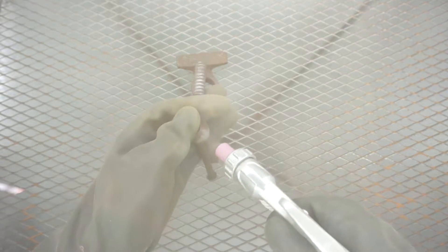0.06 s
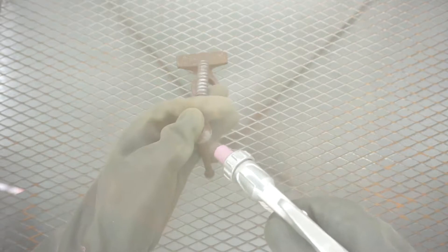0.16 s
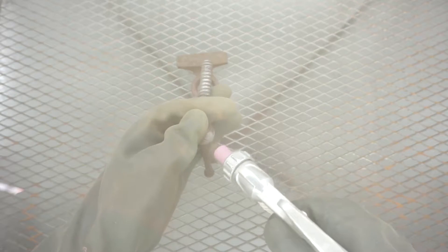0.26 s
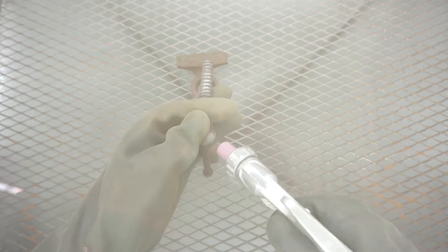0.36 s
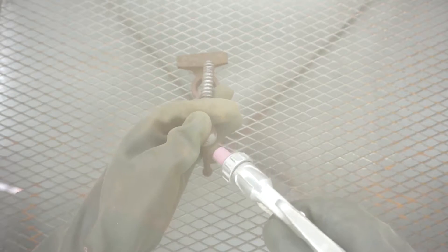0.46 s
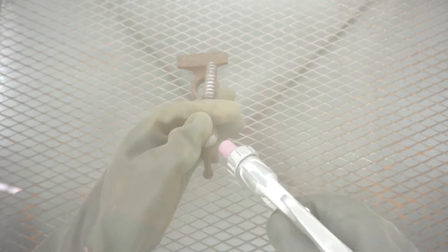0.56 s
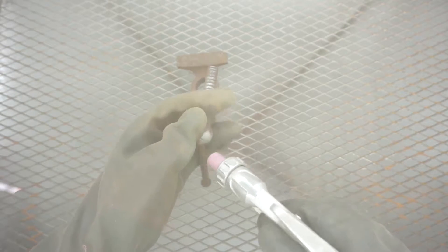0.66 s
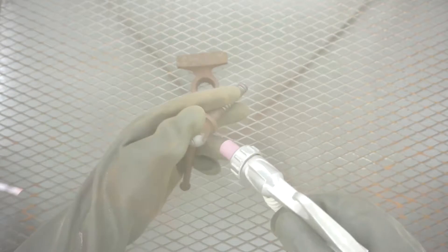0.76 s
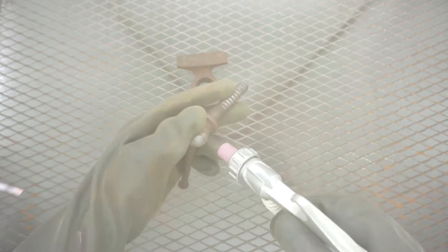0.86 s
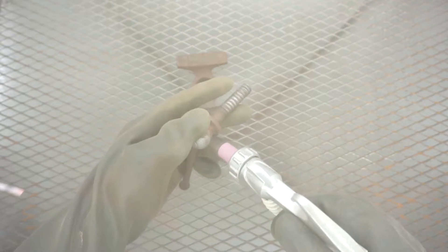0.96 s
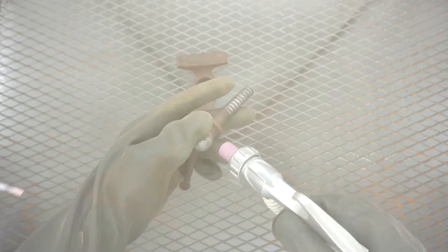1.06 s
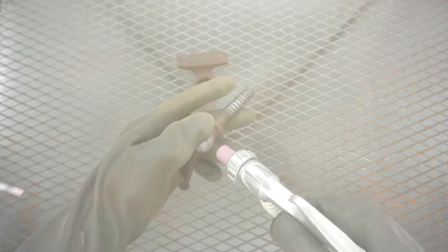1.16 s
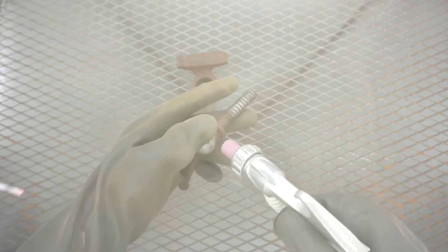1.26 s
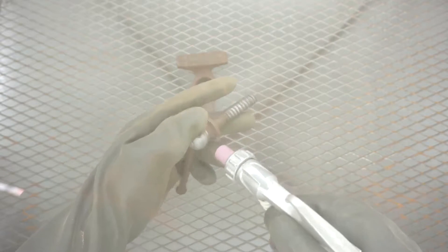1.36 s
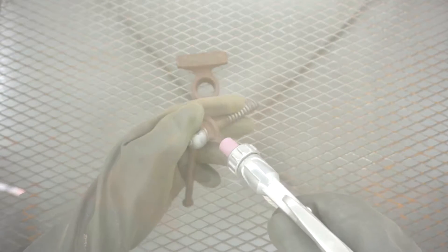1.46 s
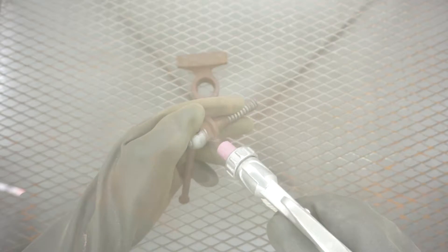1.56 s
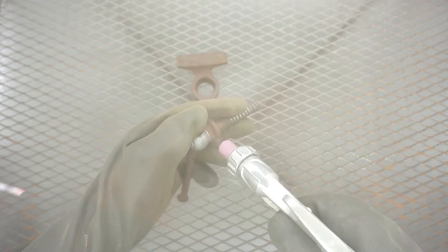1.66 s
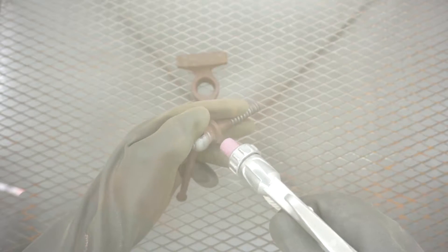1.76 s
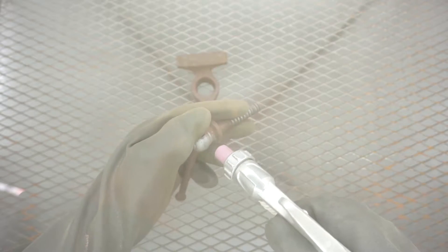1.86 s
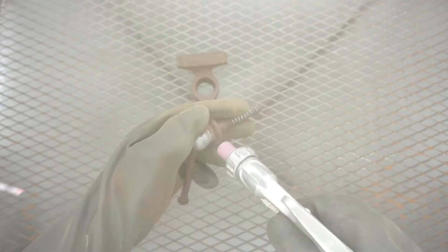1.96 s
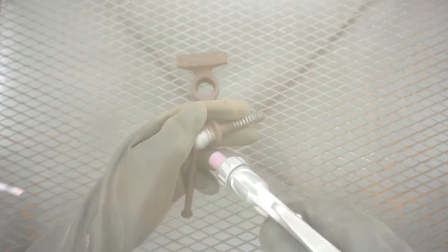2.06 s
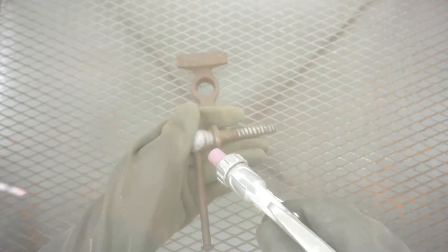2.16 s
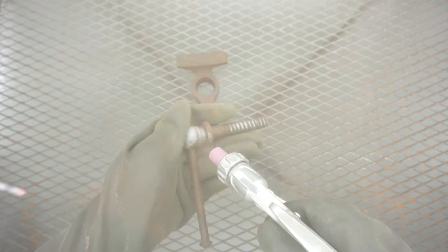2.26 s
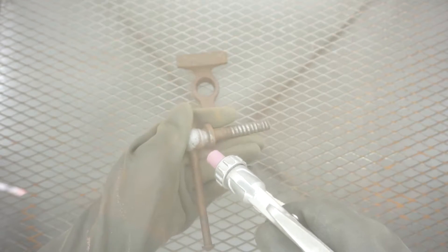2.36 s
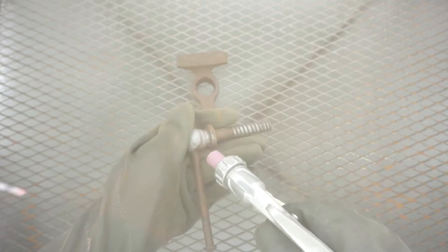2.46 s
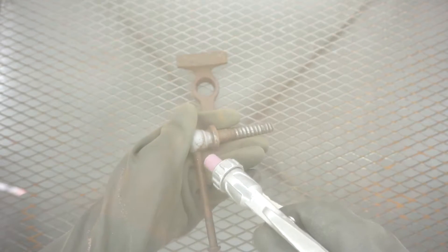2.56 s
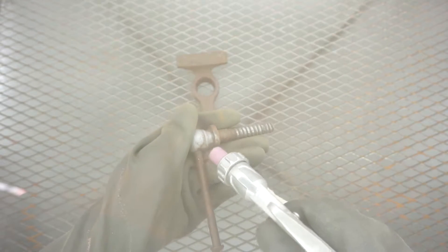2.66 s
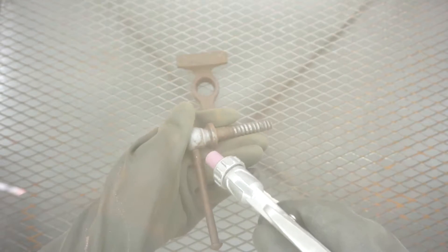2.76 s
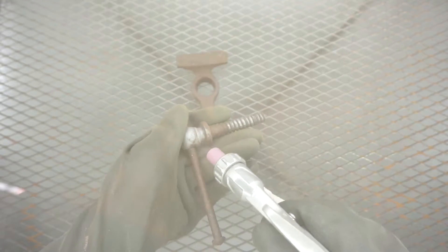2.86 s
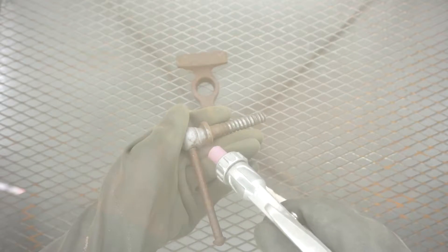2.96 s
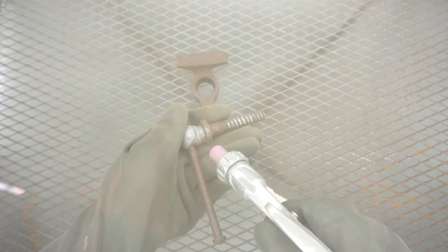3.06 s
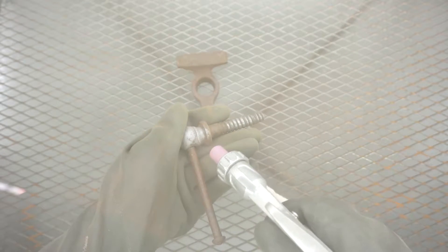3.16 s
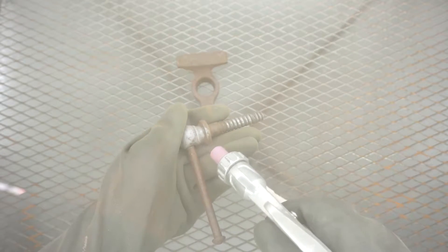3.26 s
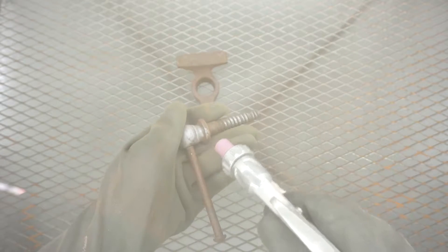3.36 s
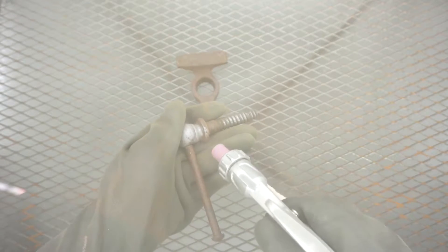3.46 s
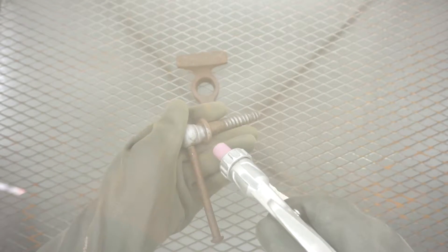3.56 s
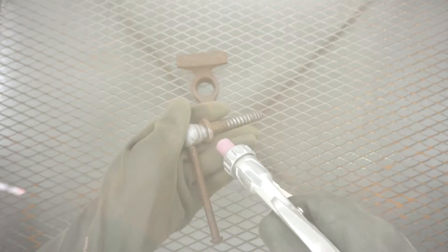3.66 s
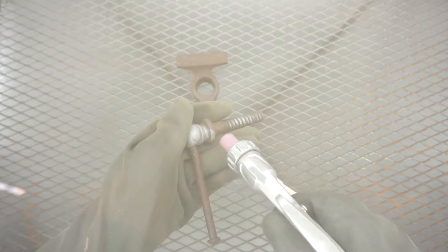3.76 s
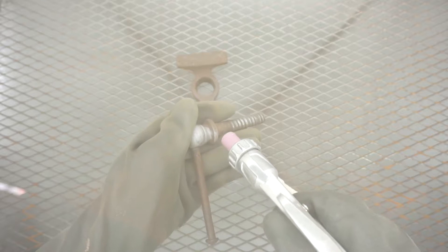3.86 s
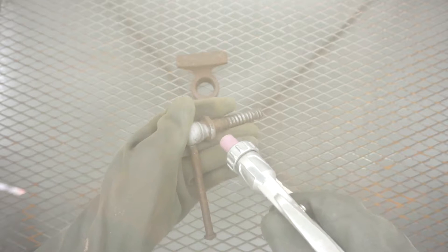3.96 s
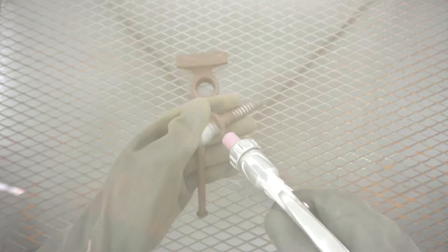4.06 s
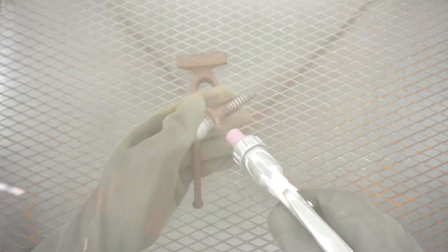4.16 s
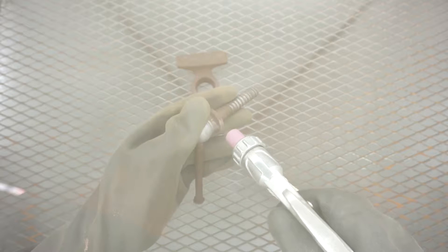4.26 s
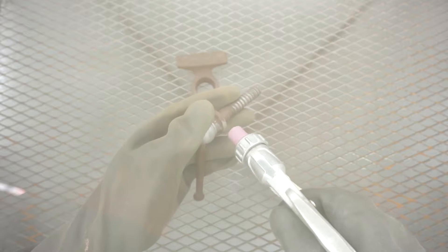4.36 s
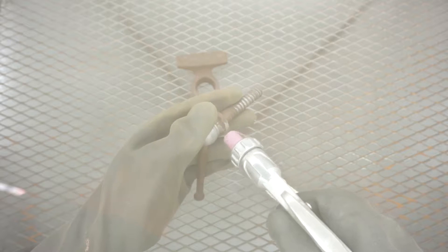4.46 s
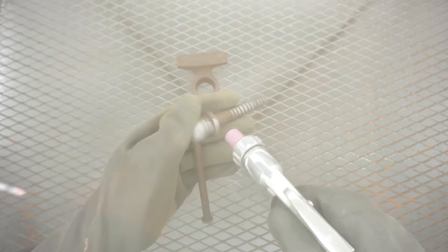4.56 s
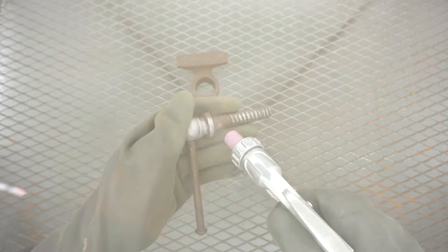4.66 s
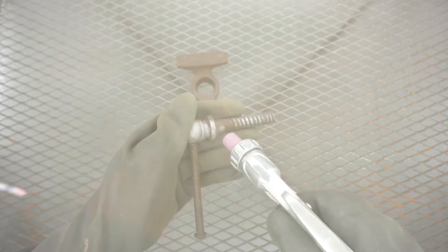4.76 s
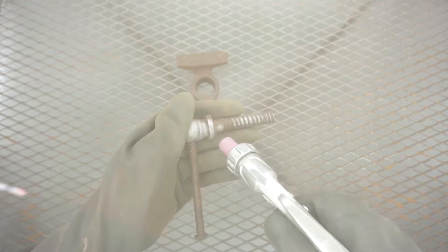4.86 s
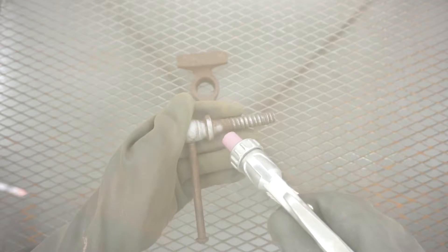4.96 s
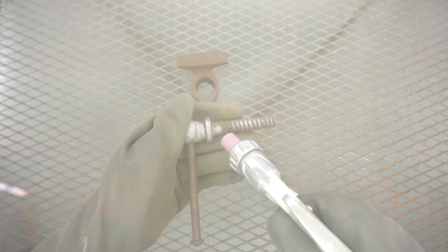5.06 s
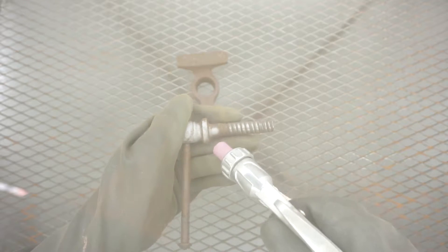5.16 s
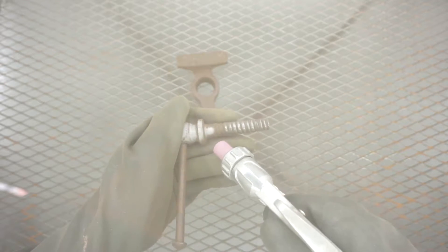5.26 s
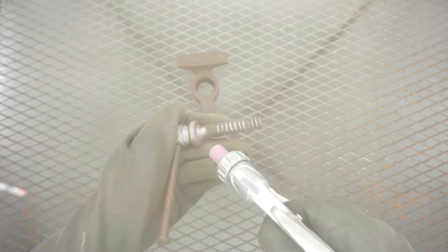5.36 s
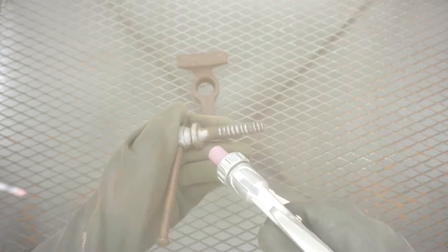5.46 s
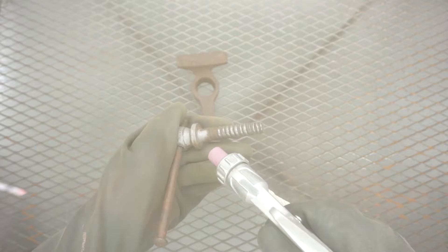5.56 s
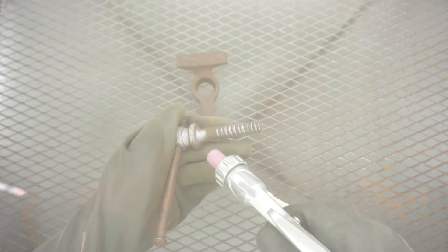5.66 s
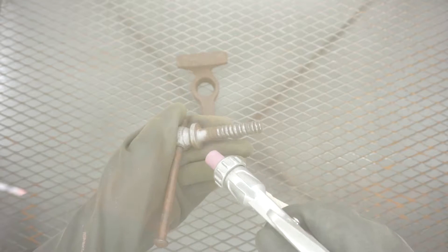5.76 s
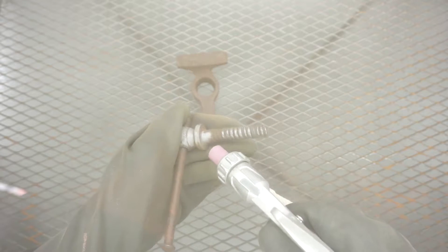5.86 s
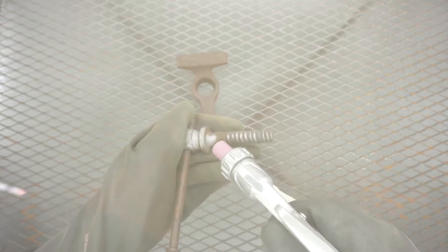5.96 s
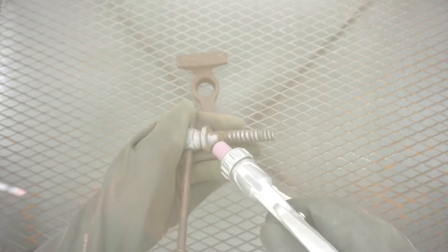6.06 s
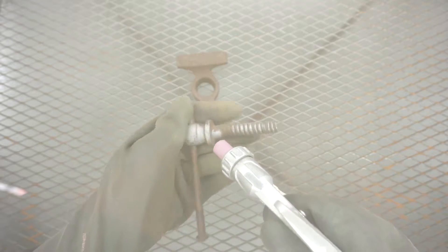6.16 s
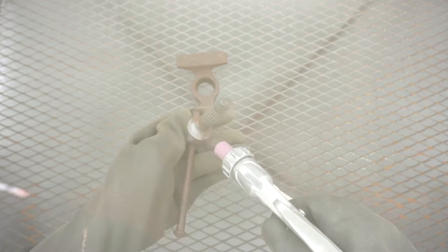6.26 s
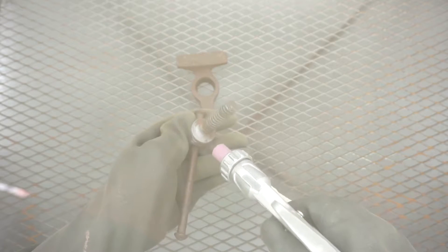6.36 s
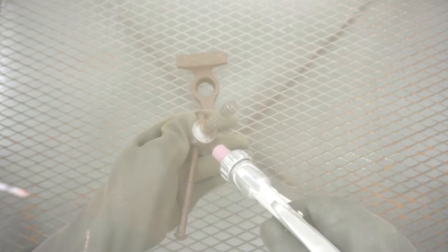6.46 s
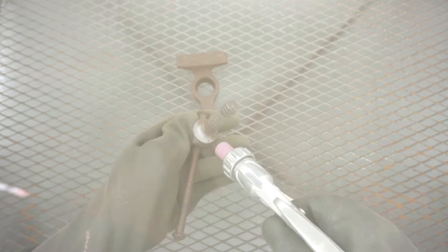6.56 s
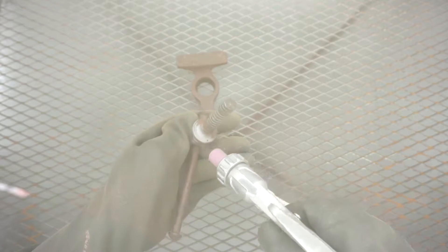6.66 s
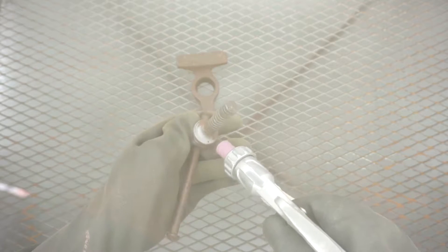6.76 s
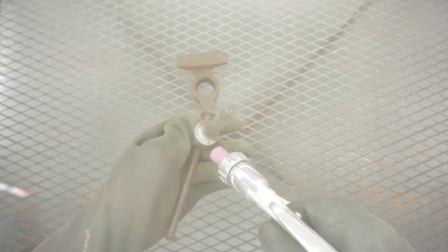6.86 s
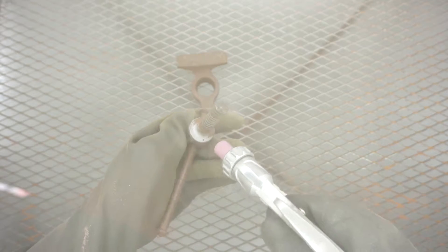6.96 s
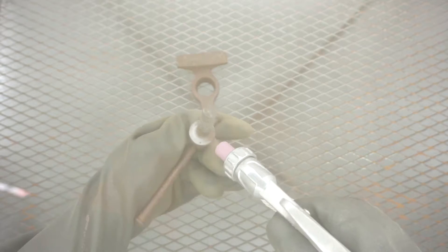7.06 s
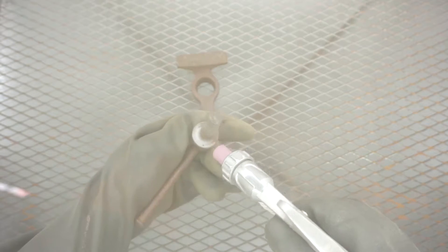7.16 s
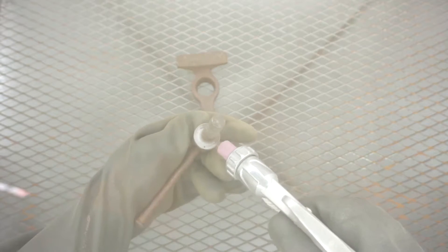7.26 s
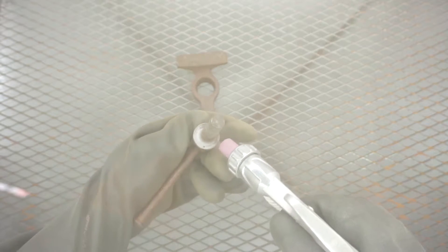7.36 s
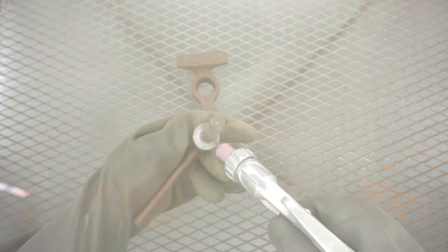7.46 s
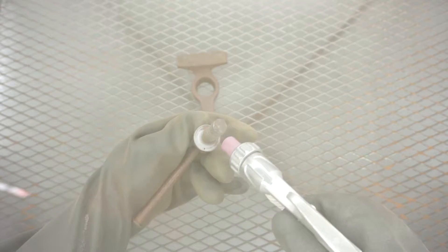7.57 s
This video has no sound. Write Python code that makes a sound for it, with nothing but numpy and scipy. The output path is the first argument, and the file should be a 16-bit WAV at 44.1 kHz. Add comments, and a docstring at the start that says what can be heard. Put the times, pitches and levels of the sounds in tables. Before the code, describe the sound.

Close inside a blast cabinet, pressurised air and abrasive make a sharp, dense hiss with a fluttering, sandy texture. The metal box roars quietly beneath, swelling and thinning as the steel part swings through the jet. Very brief dips punctuate the noise, some with soft dull thuds. Faint airy hoots and low booms come and go above a weak extractor drone, heard in wide stereo.

```python
"""Sandblasting in a steel cabinet

Inside a sheet-metal blast cabinet a gun strips rust from a steel clamp screw, heard at two microphone ports.
Up front the nozzle hisses (shaped noise), grit sprays off the part (tiny impacts) and the cabinet roars
(resonant noise). The jet sizzles and faintly whistles on the steel; now and then the level dips briefly.
Behind it a motor hums (sines), a fan rumbles, and the glove and box add breaths, booms and soft thuds."""
import sys
import numpy as np
from scipy import signal
from scipy.fft import rfft, irfft
from scipy.io import wavfile
from scipy.ndimage import uniform_filter1d

SR = 44100
rng = np.random.default_rng(int(sys.argv[2]) if len(sys.argv) > 2 else 0)


def inscribe(sig):
    """Save sig as 16-bit PCM at rate SR to the path in sys.argv[1].

    A 1-D sig is mono; a 2-D sig holds one channel per row.
    Samples are clipped to [-1, 1] before scaling.
    """
    pcm = np.round(np.clip(np.atleast_2d(sig).T, -1, 1) * 32767)
    wavfile.write(sys.argv[1], SR, pcm.astype(np.int16))


N = 336042
TIME = np.arange(N) / SR   # s
FREQ = np.maximum(np.arange(N // 2 + 1) * SR / N, 1)   # Hz


def from_db(db):
    """Decibels to gain."""
    return 10 ** (np.asarray(db) / 20)


def rms_one(x):
    """Scale to unit power."""
    return x / np.sqrt(np.mean(x ** 2) + 1e-20)


def evened(x, size=4400):
    """A steadily driven resonance keeps its strength over any stretch of size samples; rms 1."""
    power = uniform_filter1d(np.mean(x ** 2, axis=0), size=size)
    return rms_one(x / np.sqrt(power + 1e-12))


def at_hz(rows, hz):
    """Every column of a table, read on a log-frequency axis."""
    points, *columns = np.transpose(rows)
    return [np.interp(np.log(hz), np.log(points), c) for c in columns]


def at_time(rows):
    """A level in dB drawn through rows of time and level."""
    return np.interp(TIME, *np.transpose(rows))


def drift(rate_hz):
    """Slow random wander of spread 1: noise through two equal low-pass poles."""
    step = 40   # samples between the points of the wander
    r = np.exp(-2 * np.pi * step * rate_hz / SR)
    noise = rng.standard_normal(N // step + 2002)
    slow = signal.lfilter([1], [1, -2 * r, r * r], noise)[2000:]   # drop the filter's start
    return np.interp(np.arange(N) / step, np.arange(len(slow)), rms_one(slow))


def swell(middle, length):
    """A smooth rise and fall, 1 in the middle."""
    return np.cos(np.pi * np.clip((TIME - middle) / length, -.5, .5)) ** 2


def swells(rows, column=0):
    """Level in dB summed from rows of middle, length and levels."""
    return sum(levels[column] * swell(middle, length) for middle, length, *levels in rows)


def resonance(hz, width_hz):
    """Power response of one mode, 1 on top."""
    return 1 / (1 + ((FREQ ** 2 - hz ** 2) / (FREQ * width_hz)) ** 2)


def colour(spectrum, modes=()):
    """Gain per frequency: a smooth slope with the power of resonances added to it."""
    peaks = sum(from_db(db) ** 2 * resonance(hz, width) for hz, width, db in modes)
    return from_db(at_hz(spectrum, FREQ)[0]) * np.sqrt(1 + peaks)


def fine_notches(depth_db, spacing_hz):
    """Fine random notches make the noise grainier and leave the broad colour alone."""
    knots = np.arange(0, SR / 2, spacing_hz)
    depths = rng.random(len(knots)) ** 1.5
    notches = from_db(-depth_db * np.interp(FREQ, knots, depths))
    return notches / np.sqrt(uniform_filter1d(notches ** 2, size=4000))


def shifting_grain(x, depth_db, spacing_hz, rate_hz, count):
    """The grain of the noise shifts at random from one notch pattern into another."""
    spectrum = rfft(x)
    weights = np.exp(3 * np.array([drift(rate_hz) for _ in range(count)]))
    weights = weights / weights.sum(axis=0)
    patterns = [irfft(spectrum * fine_notches(depth_db, spacing_hz), N) for _ in range(count)]
    notched = np.array([rms_one(p) for p in patterns])
    alike = np.mean(notched[0] * notched[1:])
    power = alike + (1 - alike) * np.sum(weights ** 2, axis=0)   # the blend keeps its loudness
    return rms_one(np.sum(weights[:, None] * notched, axis=0) / np.sqrt(power))


def air():
    """Three unrelated turbulent noises: one that both ports share and one for each alone."""
    return rng.standard_normal((3, N))


def grit(per_s, size_db):
    """Countless tiny impacts of uneven strength, dealt to the same three paths."""
    sizes = from_db(size_db * np.minimum(rng.exponential(1, (3, N)), 5))
    signs = rng.choice([-1, 1], (3, N))
    hits = rng.random((3, N)) < per_s / SR
    return rms_one(sizes * signs * hits)


# The two microphone ports. Each row: frequency in Hz, likeness from 0 to 1,
# lead of the right port in radians, left minus right in dB.
PORTS = [(60, 1, 0.04, -1), (356, 0.32, 0.45, 3.5), (660, 0.89, 0.88, -3), (1400, 0.68, 1.22, 4),
         (2540, 0.23, 0.58, 2), (4800, 0.03, 0.9, 2), (6220, 0.9, 2.08, 3), (8030, 0.68, 1.73, 3),
         (9700, 0.17, 4.7, 2.5), (11900, 0.08, 2, 4), (16500, 0.3, 0.68, 3)]


def heard(paths, gain):
    """Colour a source and bring it to the two ports, partly shared and partly separate; rms 1."""
    alike, lead, tilt_db = at_hz(PORTS, FREQ)
    alike = np.clip(alike, 0, 1)
    spectra = rfft(paths)
    direct = spectra[0] * np.exp(.5j * lead * [[-1], [1]])
    both = np.sqrt(alike) * direct + np.sqrt(1 - alike) * spectra[1:]
    return rms_one(irfft(both * gain * from_db(tilt_db * [[.5], [-.5]]), N))


# Brief dips in level. Each row: moment of return in seconds, length of the dip in seconds, depth in dB.
DIPS = [(0.027, 0.049, -14.5), (0.762, 0.044, -13), (1.479, 0.058, -15.5), (2.229, 0.058, -20),
        (2.896, 0.042, -11), (3.497, 0.048, -20), (4.131, 0.045, -18), (4.665, 0.02, -5),
        (5.366, 0.05, -14), (6.249, 0.061, -19), (7.085, 0.042, -16)]
DIP_BEND = 0.86   # below 1 the fall in dB is a little steeper at first
# in each dip the spray and the roar fall less far than the hiss
SPRAY_DIP_SHARE, ROAR_DIP_SHARE = 0.8, 0.61


def dip_gain(share=1):
    """The level falls away through each dip and is back within a millisecond."""
    db = np.zeros(N)
    for back, length, depth_db in DIPS:
        progress = np.clip((TIME - back) / length + 1, 0, 1) * (TIME < back)
        db += depth_db * progress ** DIP_BEND
    return uniform_filter1d(from_db(share * db), size=16)


AFTER_DIP_S = 0.093


def after_dip():
    """1 as the level returns from a dip, then fading smoothly to 0."""
    return sum((TIME >= back) * np.exp(-((TIME - back) / AFTER_DIP_S) ** 2) for back, *_ in DIPS)


# Air rumble in the cabinet. Each row: frequency in Hz, gain in dB.
FAN_COLOUR = [(20, -36), (60, -15), (150, -12), (200, -6.5), (260, -8), (330, 0), (420, 1.5), (500, -3.5),
              (800, -9.5), (1200, -11), (3000, -9), (12000, -18)]
# Resonances of the rumble. Each row: frequency in Hz, width in Hz, level over the colour in dB.
FAN_MODES = [(312, 26, -.5), (384, 28, 5), (618, 26, 5)]
FAN_DB = -68.2   # between the dips


def fan():
    """Air drawn through the cabinet rumbles in its lowest resonances."""
    return heard(air(), colour(FAN_COLOUR, FAN_MODES)) * from_db(FAN_DB + drift(6.8))


# Shaft orders of the extractor motor. Each row: multiple of the shaft rate, relative level in dB.
MOTOR_ORDERS = [(1, -52), (2, -21), (3, -17), (4, -7.5), (5, -6.5), (6, 0), (7, 3), (8, -13), (9, -6.5),
                (10, -9), (11, 2), (12, -24), (13, -8), (14, -8.5), (15, -12.5), (18, -28)]
MOTOR_HZ, MOTOR_DB = 57.0, -65.7   # shaft rate; level of the whole hum between the dips
PANEL_HZ, PANEL_DB = 181, -16   # a lone tone beside the shaft orders, level relative to them


def motor():
    """Sines on the shaft orders waver a little; their phases skip at the end of every dip."""
    stretch = np.searchsorted([back for back, *_ in DIPS], TIME)
    turns = MOTOR_HZ * TIME + 0.00086 * drift(3.2)
    tones = [(order * MOTOR_HZ, db) for order, db in MOTOR_ORDERS] + [(PANEL_HZ, PANEL_DB)]
    out = 0
    for hz, db in tones:
        alike, lead, tilt_db = at_hz(PORTS, hz)
        phases = np.exp(2j * np.pi * rng.random(len(DIPS) + 1))
        skip = uniform_filter1d(phases[stretch], size=400)
        tone = from_db(db + 0.55 * drift(2.3)) * skip * np.exp(2j * np.pi * turns * hz / MOTOR_HZ)
        # the ports hear it a moment apart
        out = out + np.real(tone * np.exp(.5j * lead * np.array([[-1], [1]])))
    return from_db(MOTOR_DB) * rms_one(out)


def extractor():
    """The motor's hum and the fan's rumble come up a little in level, by less than 4.6 dB, while the hiss dips."""
    return (motor() + fan()) * from_db(4.6 * (1 - dip_gain()))


# Soft thuds near the end of some dips. Each row: start in seconds, peak level in dB.
THUDS = [(.758, -66), (1.477, -75), (2.894, -68), (7.082, -80)]


def thuds():
    """Short, dull pulses of pressure, each at its peak 0.82 ms after it starts."""
    out = np.zeros(N)
    for start, db in THUDS:
        age = np.clip((TIME - start) / 0.00082, 0, 50)
        out += from_db(db) * age * np.exp(1 - age)
    return out


# The jet blows across a hollow of the glove. Each row: middle in seconds, length in seconds,
# start frequency in Hz, end frequency in Hz, level in dB.
HOOTS = [(1.35, 0.16, 697, 697, -71), (2.046, 0.2, 740, 749, -71), (5.086, 0.187, 656, 1030, -72),
         (5.172, 0.06, 1196, 1260, -65)]


def hoots():
    """Narrow, breathy resonances swell, some gliding in pitch as the hollow changes shape."""
    out = np.zeros(N)
    for middle, length, start_hz, end_hz, db in HOOTS:
        progress = np.clip((TIME - middle) / length + .5, 0, 1)
        phase = 2 * np.pi * np.cumsum(start_hz + (end_hz - start_hz) * progress) / SR
        breath = drift(35) * np.cos(phase) + drift(39) * np.sin(phase)
        out += from_db(db) * np.sin(np.pi * progress) * breath
    return out


# Swells as the jet meets the glove. Each row: middle in seconds, length in seconds, rise in dB.
HOLLOWS = [(.25, .6, 7), (.95, 0.34, 12), (1.25, .4, 6), (2.04, 0.2, 7), (3.9, .26, 7), (4.45, .4, 4),
           (5.08, .22, 8), (6.0, 0.31, 6), (6.7, .7, 0)]
HOLLOW_HZ, HOLLOW_WIDTH_HZ, HOLLOW_DB = 725, 110, -81   # level between the swells


def hollow():
    """Air rushes in the folds of the glove: a breathy, narrow band of noise."""
    rush = evened(heard(air(), resonance(HOLLOW_HZ, HOLLOW_WIDTH_HZ)))
    return rush * from_db(HOLLOW_DB + swells(HOLLOWS))


# Lowest air modes of the cabinet. Each row: frequency in Hz, width in Hz, relative level in dB.
BOX_MODES = [(312, 30, -9), (384, 26, 0)]
# The jet turns into the open cabinet. Each row: middle in seconds, length in seconds, rise in dB.
BOOMS = [(1.32, .4, 8.5), (3.89, 0.22, 12.5), (6.11, 0.53, 11)]
BOOM_DB = -75   # between the booms


def boom():
    """The lowest air modes of the box, driven by noise, carry on through the dips."""
    modes = sum(from_db(db) * resonance(hz, width) for hz, width, db in BOX_MODES)
    return evened(heard(air(), modes)) * from_db(BOOM_DB + swells(BOOMS))


# The turning part swings into the jet (+) or out of it (-), also for the roar and spray below.
# Each row: middle in seconds, length in seconds, changes of roar, of grit spray and of thin ring in dB.
PASSES = [(.17, 0.53, -1.5, 0.5, -10), (.41, 0.29, 0, 3, 0), (.64, 0.22, -2.5, 3, -7),
          (.92, 0.25, 2.5, 1.5, 2), (1.17, .16, 1, 2, 10), (1.35, 0.14, 4.5, 2, 14), (1.59, 0.22, 4, 2, -2),
          (1.82, 0.2, 3.5, 4.5, 7), (2.04, 0.18, 2.5, 3, -2), (2.38, 0.11, .5, 1.5, -5),
          (2.58, 0.25, -2.5, -1, -5), (2.8, 0.56, -4, -0.5, -2), (3.1, .2, 1.5, 3, 0),
          (3.32, 0.43, 2, 2, 2), (3.77, 0.5, 2.5, 3, 4), (3.97, 0.35, 2.5, 4, 3.5),
          (4.36, 0.53, 1, -0.5, -2), (4.54, 0.52, 1, 3, 5.5), (4.8, 0.85, -2.5, -2, -1),
          (5.11, .32, 3, 2.5, 2), (5.54, 0.12, 1, 1, 6), (5.78, 0.2, -.5, 0, 1), (6.06, 0.71, 4, 1, 5),
          (6.44, 0.43, 1, 1, 1), (6.7, 0.36, 0, 0, 0), (6.95, 0.3, 1, 0.5, 4), (7.3, .67, -1, -2, -1)]
RING_HZ, RING_WIDTH_HZ = 1780, 25
RING_DB, RING_AFTER_DIP_DB = -68, -3   # level between passes; its change just after a dip


def ring():
    """One thin mode of the cabinet sings out as the part deflects the jet."""
    tone = evened(heard(air(), resonance(RING_HZ, RING_WIDTH_HZ)), size=1500)
    level_db = RING_DB + swells(PASSES, column=2) + RING_AFTER_DIP_DB * after_dip()
    return tone * from_db(level_db) * dip_gain(ROAR_DIP_SHARE)


# The jet catches an edge. Each row: middle in seconds, length in seconds, rise in dB.
EDGES = [(.44, .35, 7), (2.15, 0.27, 8), (3.25, .45, -2), (3.76, 2.3, 5.5), (4.42, 0.37, 3), (5.35, 3.8, 2),
         (6.4, 0.16, 3), (6.9, 0.41, -7), (7.55, .3, 2)]
WHISTLE_HZ, WHISTLE_WIDTH_HZ, WHISTLE_WAVER_HZ = 7025, 240, 25
WHISTLE_DB = -57   # between the edges


def whistle():
    """The jet sings on an edge of the steel, wavering in pitch as the hand trembles."""
    band = resonance(WHISTLE_HZ, WHISTLE_WIDTH_HZ) * fine_notches(depth_db=6, spacing_hz=30)
    tone = evened(heard(air(), band))
    shift_hz = WHISTLE_WAVER_HZ * drift(5)
    tone = np.real(signal.hilbert(tone) * np.exp(2j * np.pi * np.cumsum(shift_hz) / SR))
    return tone * from_db(WHISTLE_DB + swells(EDGES) + 1.2 * drift(7.1)) * dip_gain()


# Sizzle of the splashing jet. Each row: time in seconds, level in dB.
SIZZLE_LEVEL = [(0, -51), (.5, -52.5), (2.0, -54), (2.5, -49.5), (3.3, -48), (4.0, -50.5), (4.3, -56),
                (5.0, -49.5), (6.1, -49), (6.4, -54), (7.62, -54)]
# Its band of hiss. Each row: frequency in Hz, gain in dB.
SIZZLE_COLOUR = [(4000, -37), (7000, 0.5), (8300, 2.5), (9300, 3), (11500, -24)]
SIZZLE_AFTER_DIP_DB = -3.5   # change just after a dip


def sizzle():
    """The jet splashes off the steel in a band of hiss just under that of the nozzle."""
    level_db = at_time(SIZZLE_LEVEL) + SIZZLE_AFTER_DIP_DB * after_dip()
    return heard(air(), colour(SIZZLE_COLOUR)) * from_db(level_db) * dip_gain()


# Roar of the sheet metal. Each row: frequency in Hz, gain in dB.
ROAR_COLOUR = [(80, -60), (450, -14), (700, -3.5), (1050, -7), (1450, -5), (2100, 2), (2700, -10),
               (4000, -18), (8000, -17)]
# Modes of the cabinet. Each row: frequency in Hz, width in Hz, level over the colour in dB.
CABINET_MODES = [(705, 26, 9), (905, 20, 7), (985, 24, 4), (1093, 10, 5), (1143, 10, 3), (1213, 11, 15),
                 (1255, 20, 0), (1385, 30, 2), (1420, 16, 7), (1450, 16, 4), (1484, 12, 9), (1543, 14, 12),
                 (1600, 14, 8), (1675, 20, 2), (1735, 26, 4), (1781, 40, 3), (1833, 14, 10), (1908, 14, 7),
                 (1975, 24, 4), (2025, 14, 1), (2115, 44, 3), (2230, 40, 0), (2395, 24, 3), (2485, 40, 1),
                 (2725, 24, 4), (2905, 60, 8)]
ROAR_DB, ROAR_AFTER_DIP_DB = -63.0, -3   # level between passes; its change just after a dip


def roar(feed):
    """Noise drives the crowded modes of the cabinet."""
    x = heard(air(), colour(ROAR_COLOUR, CABINET_MODES))
    x = shifting_grain(x, depth_db=8, spacing_hz=14, rate_hz=1.8, count=6)
    flutter_db = 0.51 * feed + 0.76 * drift(37)
    level_db = ROAR_DB + swells(PASSES) + ROAR_AFTER_DIP_DB * after_dip() + flutter_db
    return x * from_db(level_db) * dip_gain(ROAR_DIP_SHARE)


# Grit spraying off the part. Each row: frequency in Hz, gain in dB.
SPRAY_COLOUR = [(200, -57), (1500, -14.5), (2450, -5.5), (3200, -1.5), (4200, -0.1), (5700, 3.5),
                (7500, 5.5), (10000, -32)]
# Modes of the steel part. Each row: frequency in Hz, width in Hz, level over the colour in dB.
PART_MODES = [(2990, 50, -1), (3300, 50, -3), (3620, 70, -1), (4100, 170, -3), (5190, 140, -2),
              (5560, 120, -5), (5835, 100, 1)]
SPRAY_DB = -49.5   # between passes


def spray(feed):
    """Countless grit impacts excite the modes of the part, louder and softer with the abrasive feed."""
    x = heard(grit(per_s=7000, size_db=1.0), colour(SPRAY_COLOUR, PART_MODES))
    x = shifting_grain(x, depth_db=36, spacing_hz=42, rate_hz=6, count=12)
    level_db = SPRAY_DB + swells(PASSES, column=1) + 1.37 * feed
    return x * from_db(level_db) * dip_gain(SPRAY_DIP_SHARE)


# Topmost treble of the nozzle. Each row: time in seconds, change of level in dB.
SHRILL = [(0, -0.5), (.6, -0.5), (1.0, 0), (1.4, -1.5), (2.1, -2), (2.6, 0.5), (3.3, -2.5), (4.0, -1),
          (4.5, -0.5), (4.8, -1.5), (5.25, -1), (5.9, -1.5), (6.4, -0.5), (6.8, 1), (7.3, -1), (7.62, -1)]
SHRILL_HZ = 13000   # the treble above here is moved


def shrill(x):
    """The top of the hiss brightens and dulls as the gun is turned."""
    high_pass = 1 / (1 + (SHRILL_HZ / np.maximum(FREQ, 1000)) ** 24)
    top = irfft(rfft(x) * high_pass, N)
    return x + top * (from_db(at_time(SHRILL)) - 1)


# Hiss of the nozzle. Each row: frequency in Hz, gain in dB.
NOZZLE_COLOUR = [(400, -44), (2500, -69), (5000, -12), (6500, -7.5), (8700, -5.5), (10000, 0), (12500, 3),
                 (13600, 4), (14700, 6), (15700, 0.5)]
# Its shrill bands. Each row: frequency in Hz, width in Hz, level over the colour in dB.
NOZZLE_MODES = [(9530, 150, -2), (10250, 200, -5), (13635, 110, -1), (13880, 260, -3)]
# Slow changes of the air pressure. Each row: time in seconds, change of nozzle level in dB.
PRESSURE = [(0, -1), (.5, 0), (.85, -1), (1.33, 0.5), (1.42, -1), (1.6, 0), (2.1, 0.5), (2.7, -1.2),
            (3.38, 0.5), (3.8, -1.5), (4.3, -0.5), (4.7, -0.2), (5.2, 0), (5.6, 0), (6.0, 0.5), (6.5, -0.5),
            (7.0, -1), (7.62, 0.7)]
NOZZLE_DB, NOZZLE_AFTER_DIP_DB = -37.5, -0.5   # level before the pressure changes; change just after a dip


def nozzle(feed):
    """Turbulent air leaves the nozzle as a bright hiss that flutters and follows the pressure."""
    x = heard(air(), colour(NOZZLE_COLOUR, NOZZLE_MODES))
    x = shrill(shifting_grain(x, depth_db=11, spacing_hz=30, rate_hz=3.5, count=6))
    flutter_db = .2 * feed + .55 * drift(45)
    level_db = NOZZLE_DB + at_time(PRESSURE) + NOZZLE_AFTER_DIP_DB * after_dip() + flutter_db
    return x * from_db(level_db) * dip_gain()


def blast():
    """Air leaves the nozzle, grit hits the part and the cabinet roars, all on one uneven feed."""
    feed = drift(14.0)   # the abrasive arrives in uneven clumps
    return roar(feed) + spray(feed) + nozzle(feed)


def scene():
    """The extractor behind, the glove and the box around, the jet on the steel and the blast up front."""
    background = extractor() + thuds() + hoots() + hollow() + boom()
    return background + ring() + whistle() + sizzle() + blast()


def record(dry):
    """The top is cut steeply above 15750 Hz at both ports."""
    low_pass = signal.ellip(14, .1, 80, 15750, fs=SR, output="sos")
    return signal.sosfilt(low_pass, dry)


dry = scene()
out = record(dry)
inscribe(out)
```